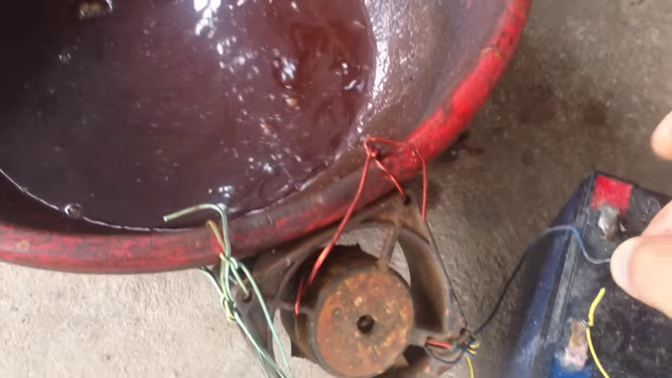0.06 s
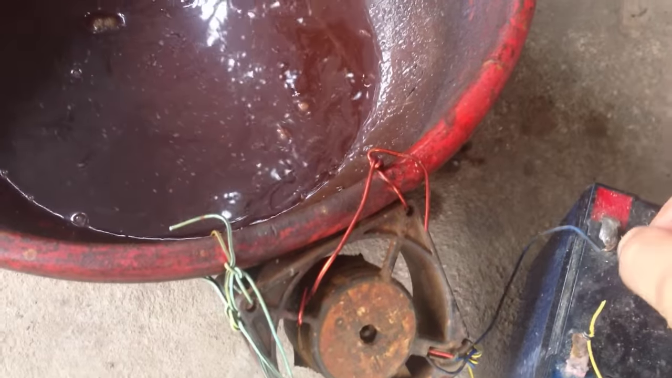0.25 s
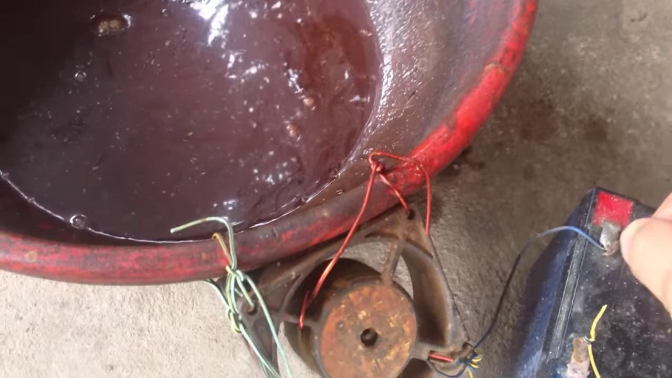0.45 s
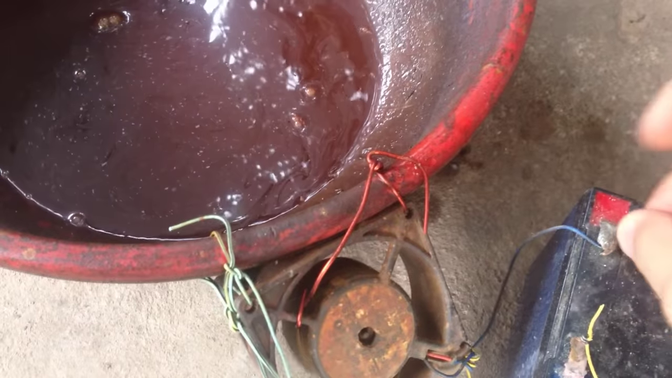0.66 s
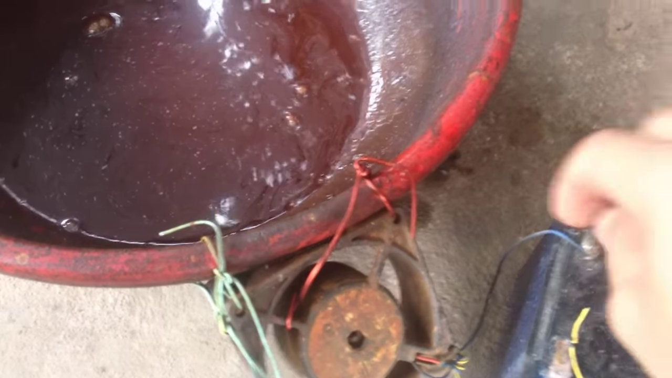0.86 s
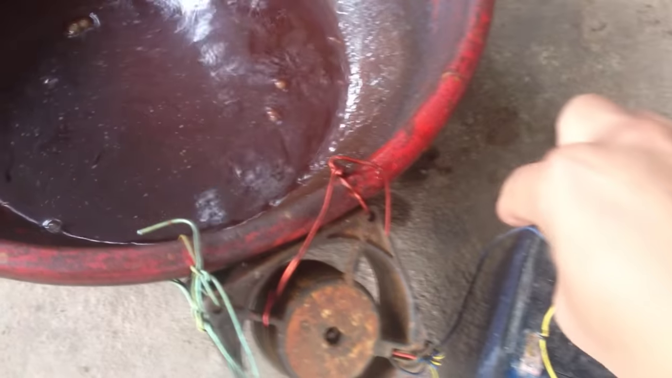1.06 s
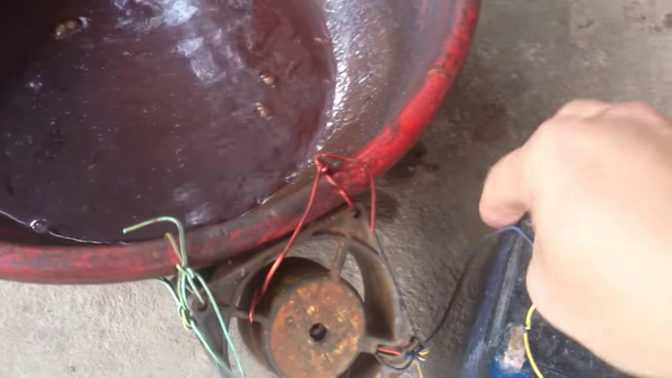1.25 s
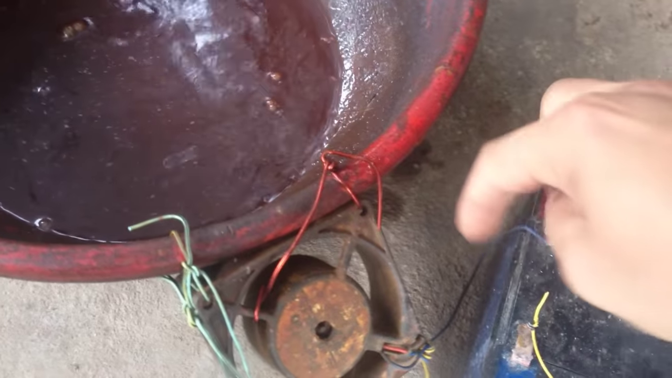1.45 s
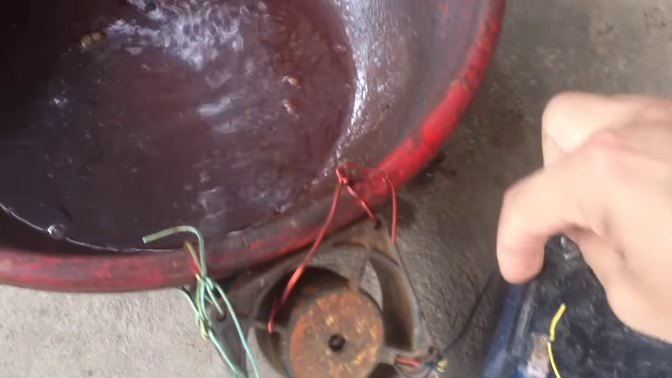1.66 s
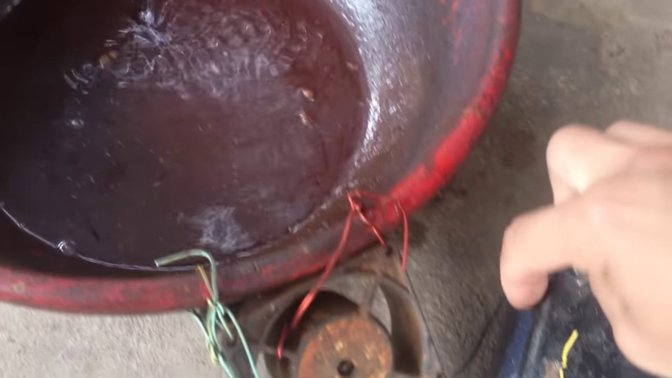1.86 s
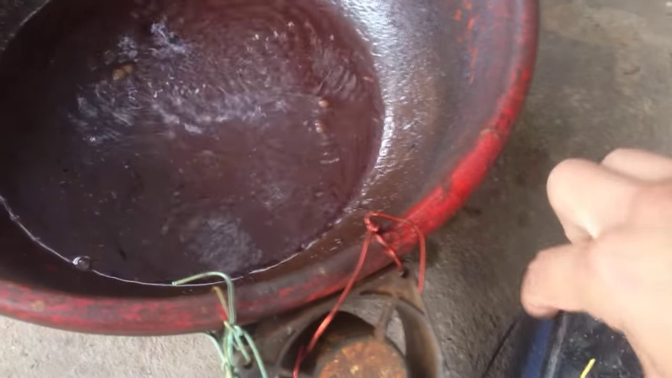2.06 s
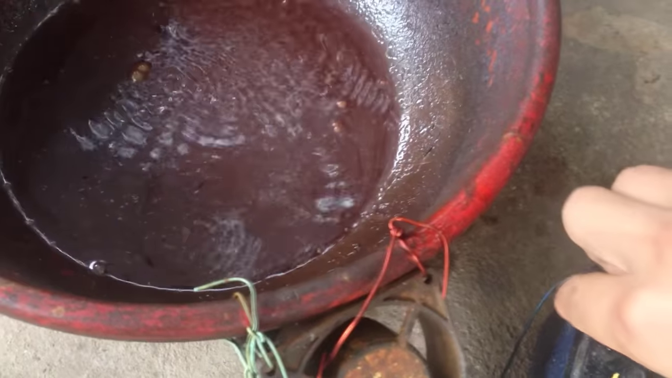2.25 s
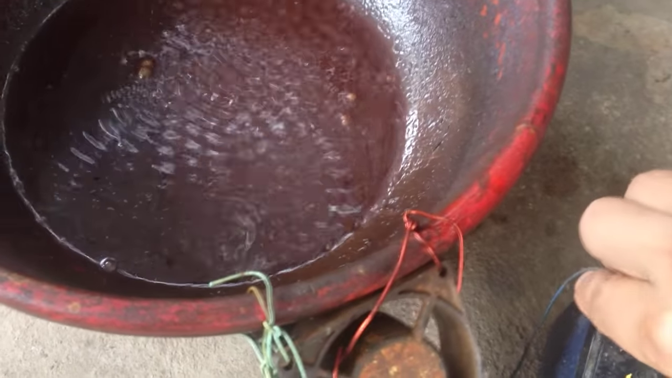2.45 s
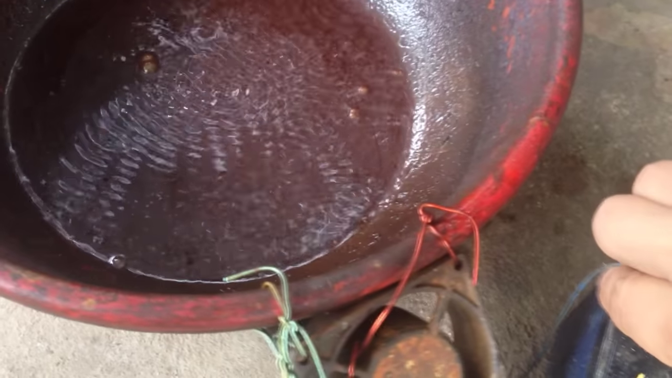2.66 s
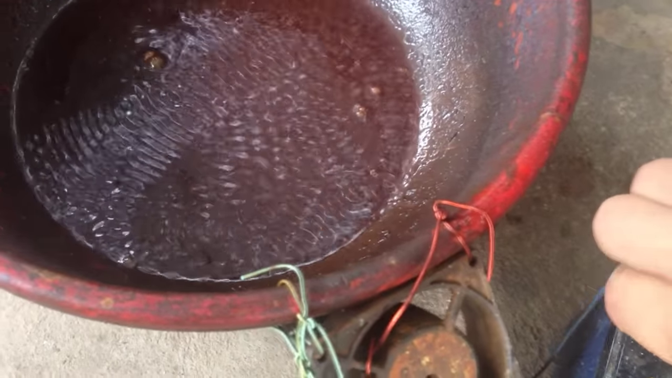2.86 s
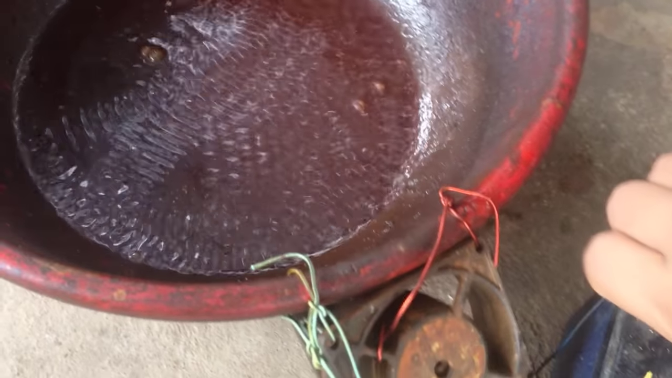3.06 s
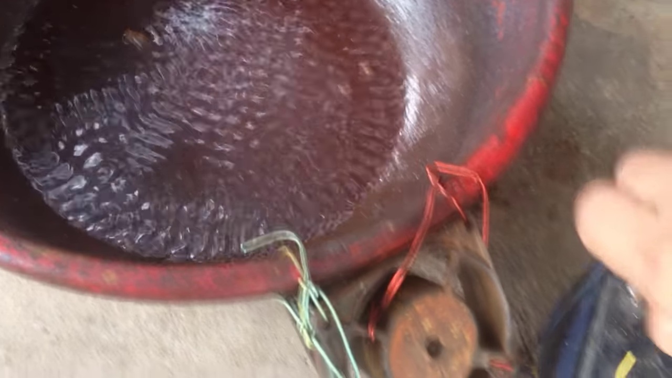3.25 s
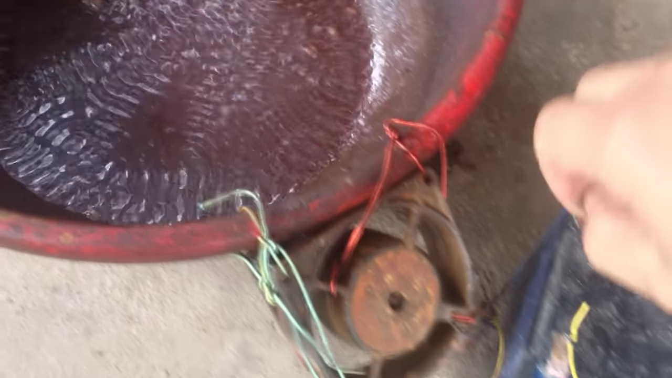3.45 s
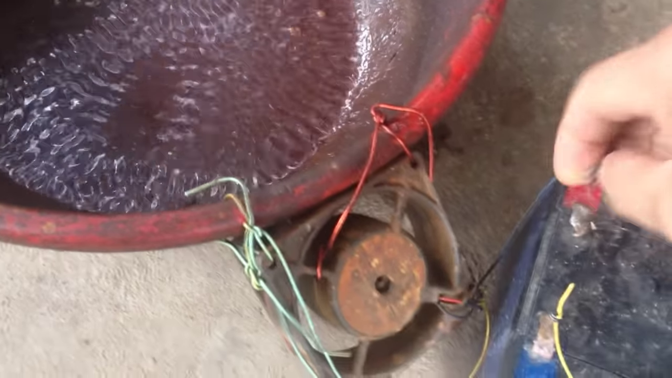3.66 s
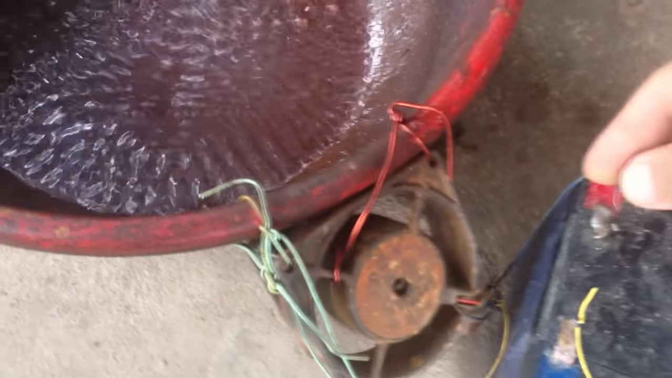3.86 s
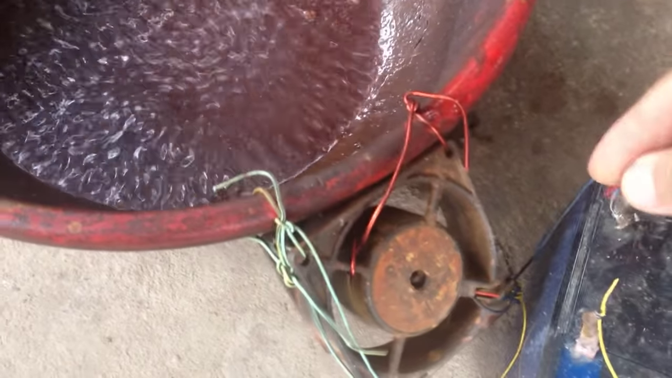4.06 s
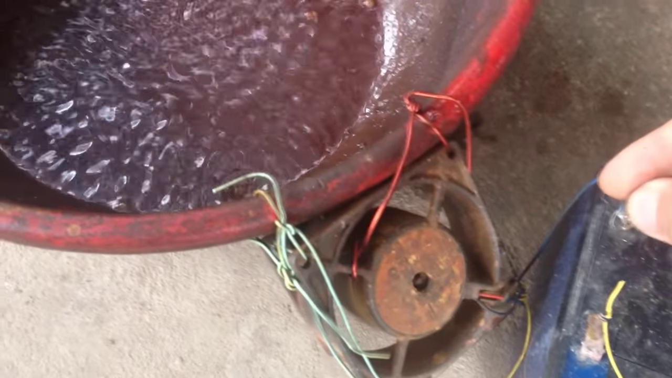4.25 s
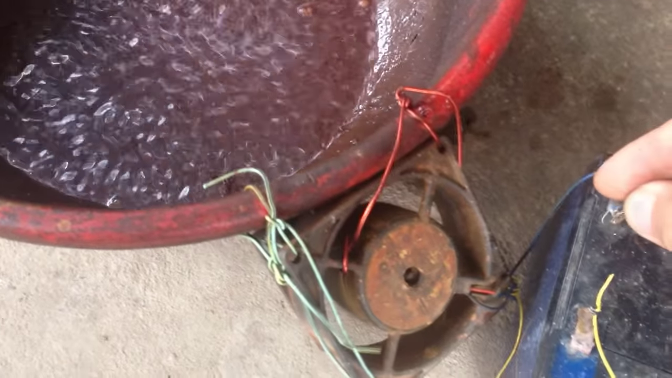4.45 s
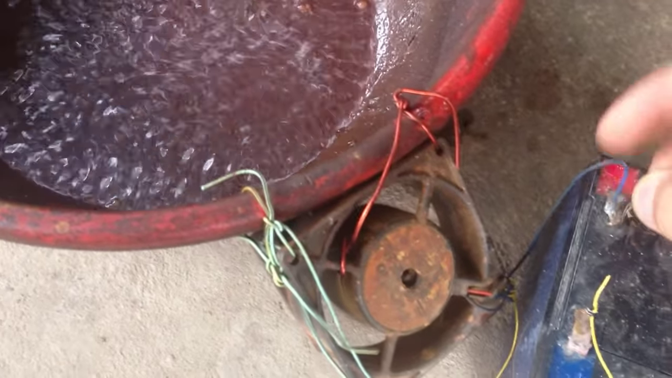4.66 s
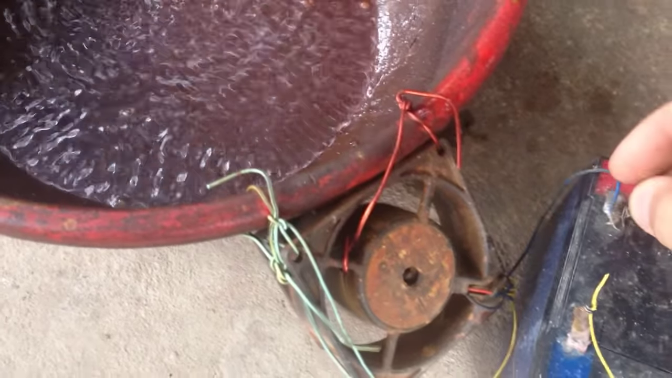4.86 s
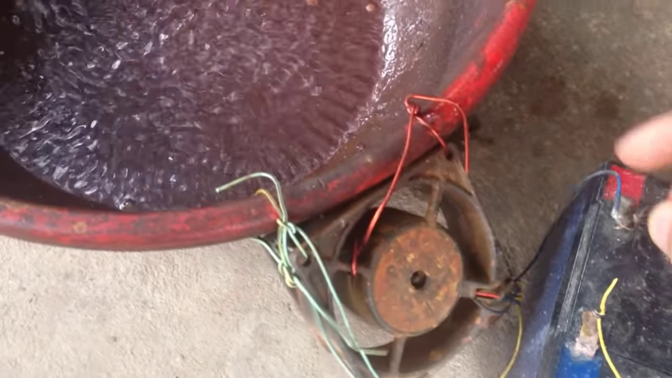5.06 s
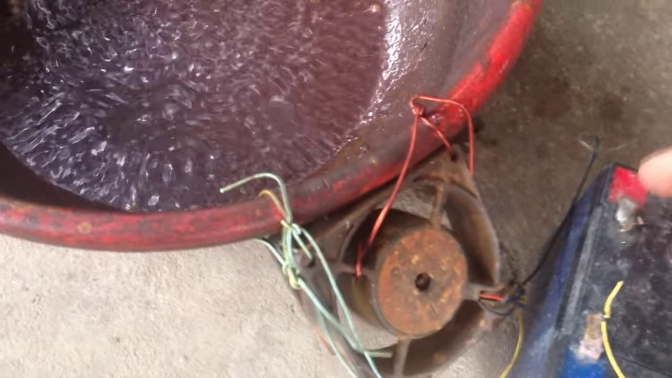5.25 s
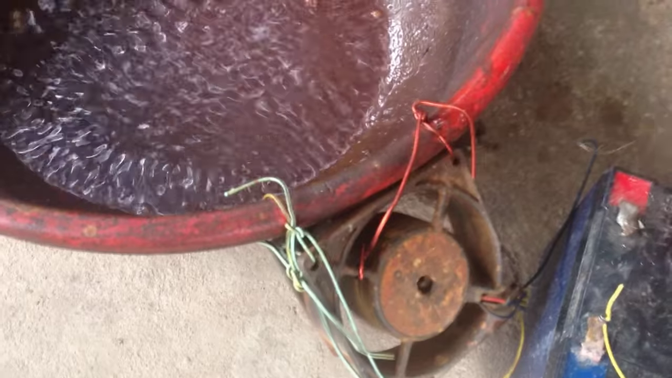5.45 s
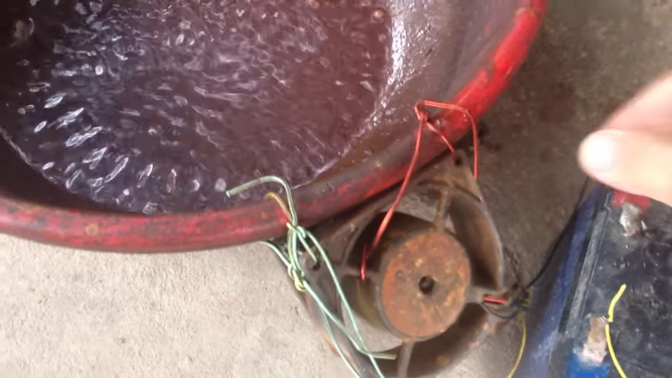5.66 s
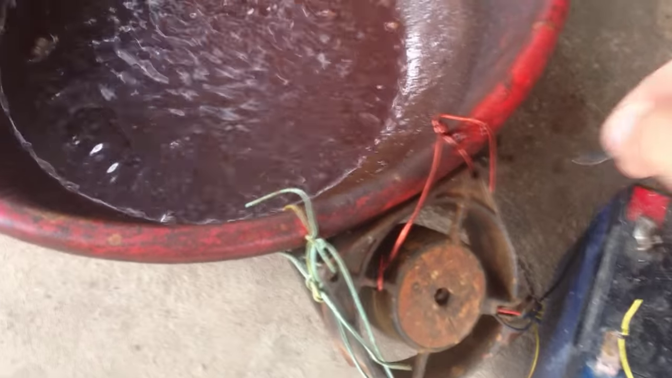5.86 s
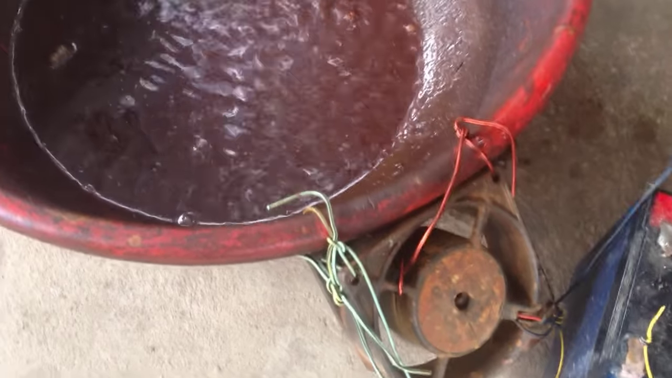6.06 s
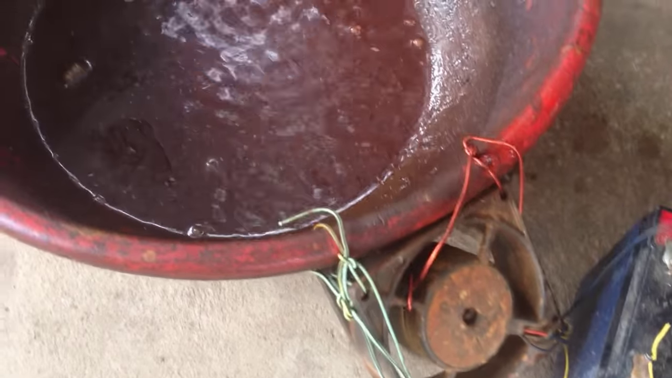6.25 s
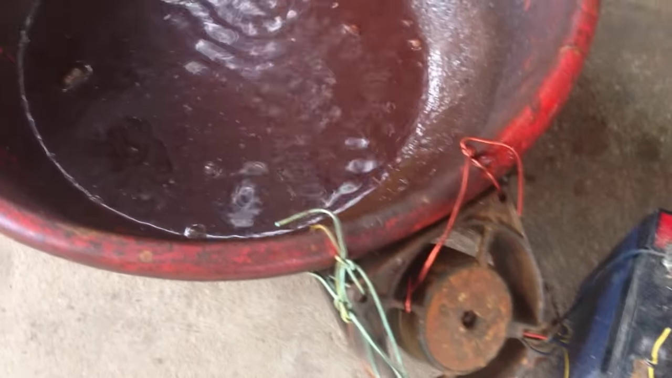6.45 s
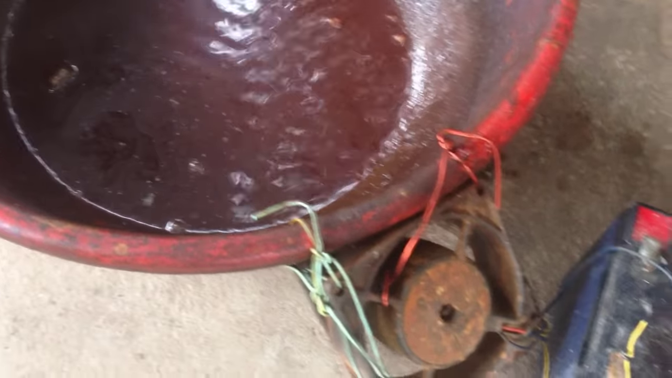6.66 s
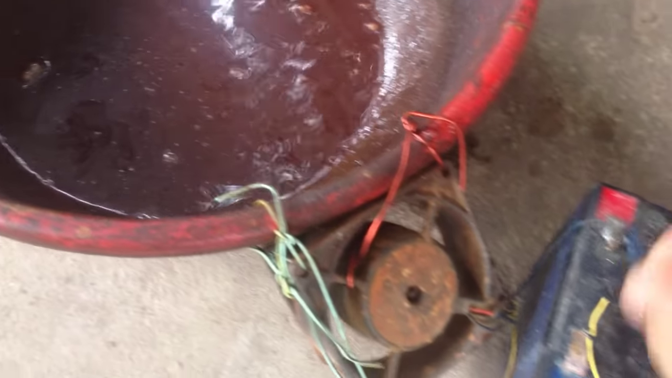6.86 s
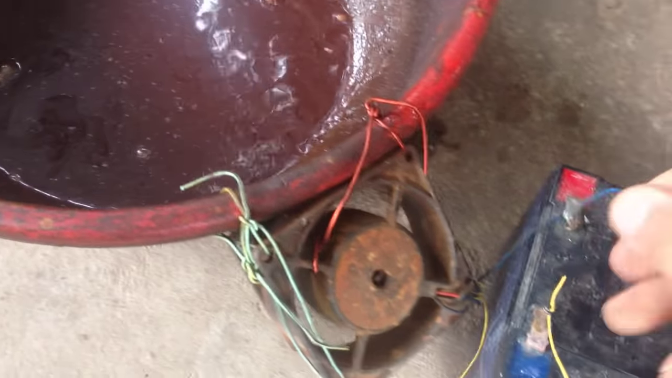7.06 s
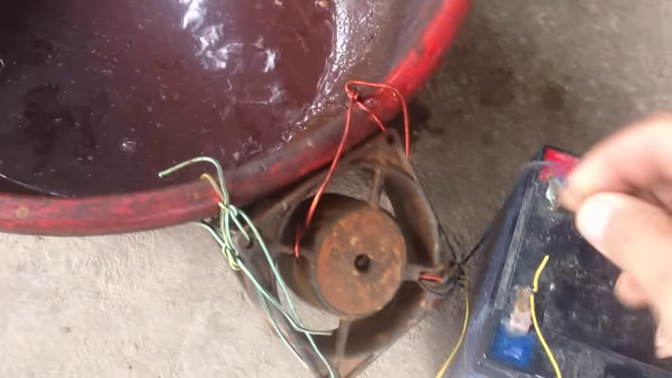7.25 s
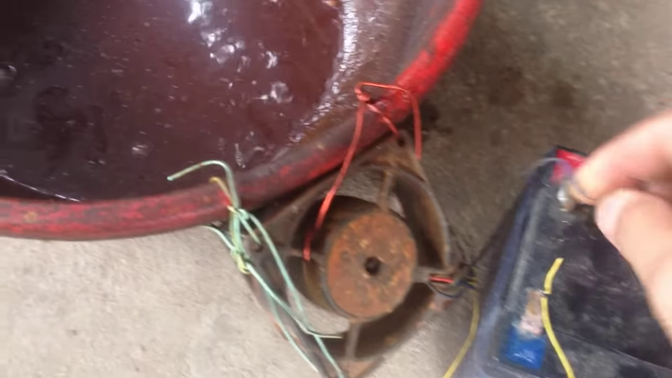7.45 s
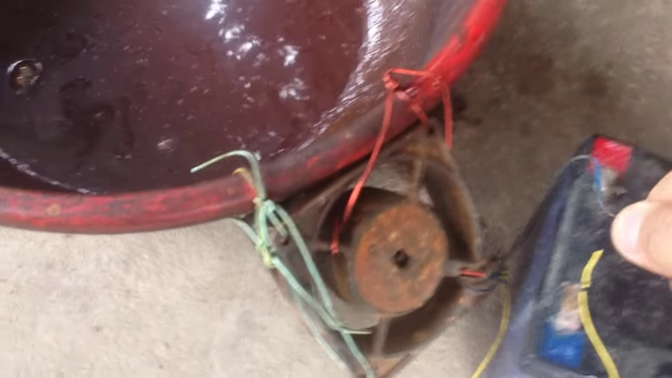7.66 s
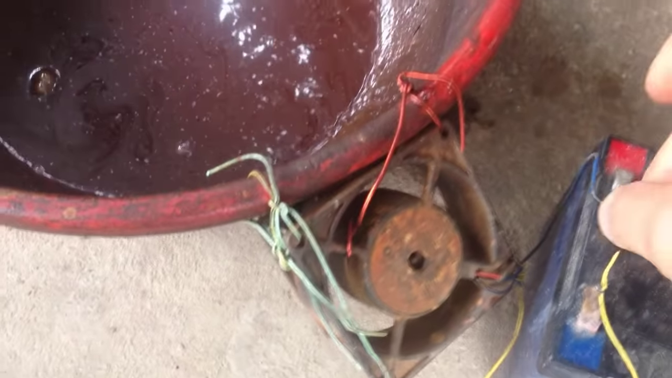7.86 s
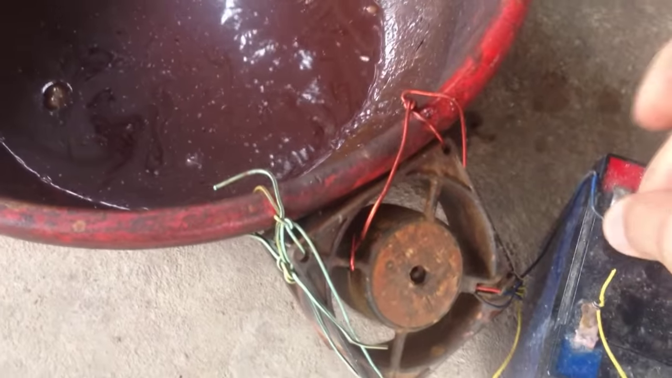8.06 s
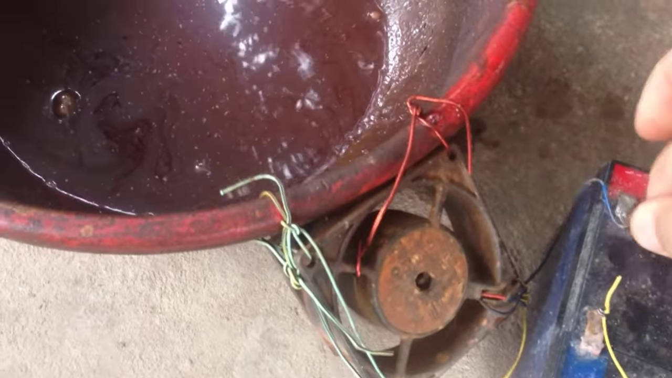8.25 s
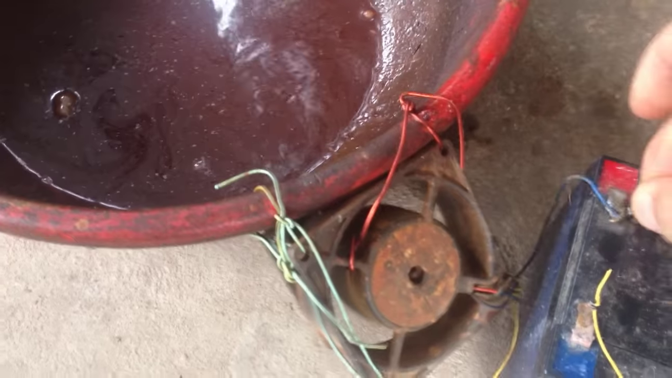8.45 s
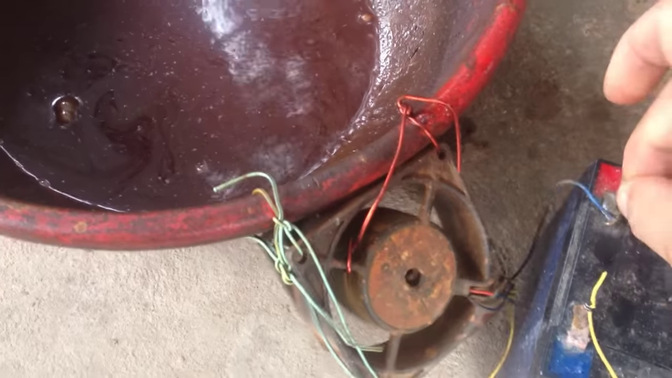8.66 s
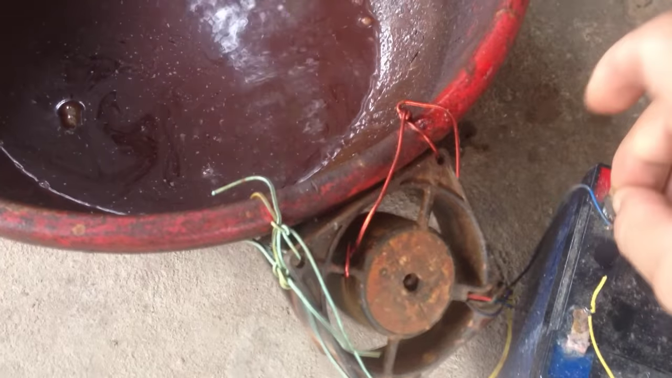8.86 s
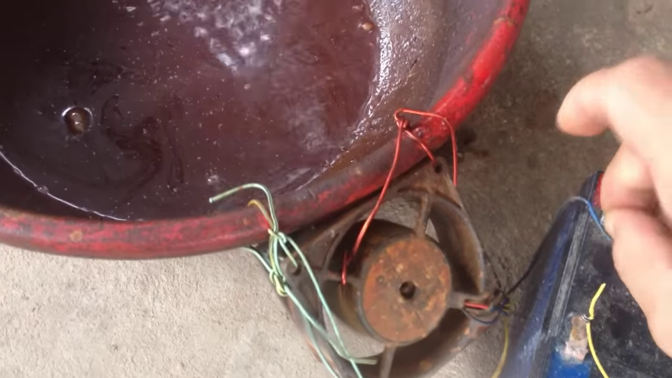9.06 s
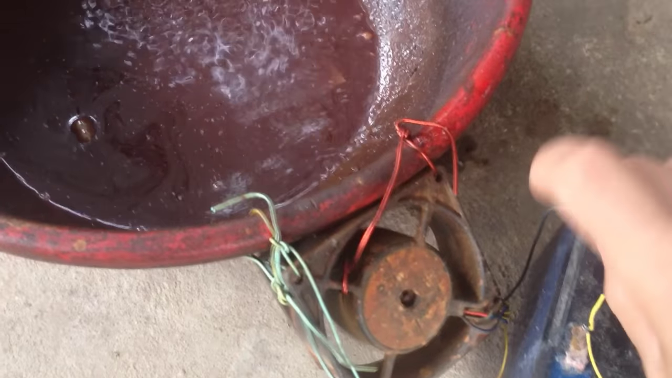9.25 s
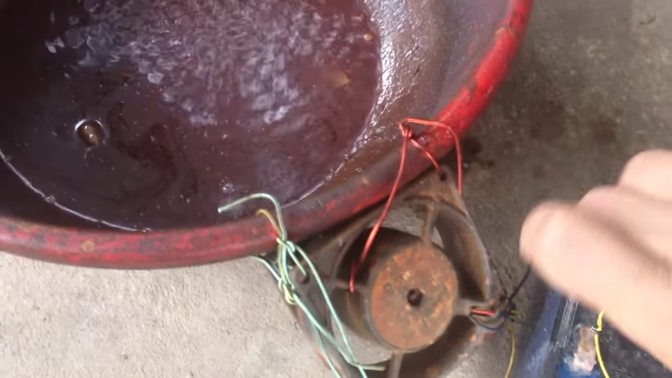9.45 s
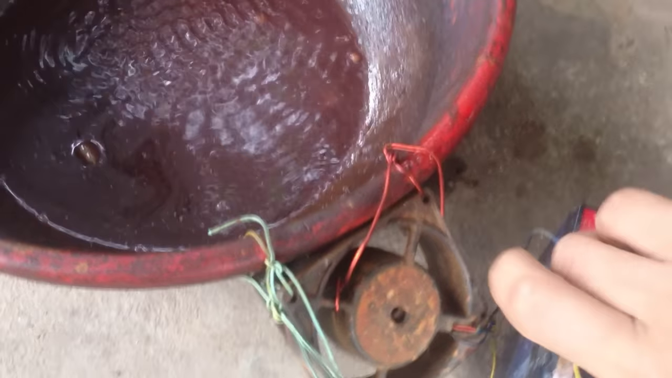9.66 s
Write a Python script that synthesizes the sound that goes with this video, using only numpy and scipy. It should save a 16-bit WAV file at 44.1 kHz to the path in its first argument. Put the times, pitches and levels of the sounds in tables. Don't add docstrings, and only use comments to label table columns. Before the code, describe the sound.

Very close outdoors, a small rusty electric fan spins up quickly, worn bearings rattling with a gritty mid-range hum and bright sizzling. It then leans on a plastic basin, adding fast thumping and a coarse rim buzz. The speed sags, recovers, then coasts down to a thinner, duller rattle before spinning up again. Sharp ticks and hollow knocks pepper it throughout.

```python
import sys
import numpy as np
from scipy import signal
from scipy.io import wavfile
from scipy.ndimage import uniform_filter1d

SR = 44100
rng = np.random.default_rng(int(sys.argv[2]) if len(sys.argv) > 2 else 0)


def unload_wav(signal):
    wavfile.write(
        sys.argv[1],
        SR,
        np.round(np.clip(np.atleast_2d(signal).T, -1, 1) * 32767).astype(np.int16),
    )


def magnitude_from_level(level_db):
    exponent = np.asarray(level_db, float) / 20
    return 10 ** exponent


N = 428211
HZ = np.fft.rfftfreq(8192, 1 / SR)


def evened(x):
    return x / np.sqrt(np.mean(x ** 2) + 1e-20)


def curves(rows):
    start_s, *columns = np.transpose(rows)
    return [np.interp(np.arange(N) / SR, start_s, column) for column in columns]


def slope(points):
    hz, level_db = np.transpose(points)
    return magnitude_from_level(np.interp(np.log(HZ + 1), np.log(hz + 1), level_db))


def modes(table, steep):
    power = 0
    for hz, width_hz, level_db in table:
        power = power + magnitude_from_level(level_db) ** 2 / (1 + (2 * (HZ - hz) / width_hz) ** 2) ** steep
    return np.sqrt(power)


def ring(x, gain):
    both_sides = np.r_[gain, gain[-2:0:-1]]
    log_gain = np.log(np.maximum(both_sides, 1e-6))
    response = np.fft.ifft(np.exp(np.conj(signal.hilbert(log_gain)))).real[:4096]
    return evened(signal.oaconvolve(x, response)[:N])


def noise():
    return rng.standard_normal(N)


def drift(hz):
    return evened(signal.lfilter(*signal.butter(2, hz, fs=SR), noise()))


def grit(per_s, spread_db):
    size = magnitude_from_level(spread_db * np.minimum(rng.exponential(1, N), 5)) * noise()
    return evened(size * (rng.random(N) < per_s / SR))


# hz, level_db (per Hz)
YARD_HISS = [(18, -38), (30, -16), (152, 3), (523, -2), (612, -14), (1420, -9), (3740, -4), (8200, -12),
             (14600, -1), (15800, -7)]
# hz, width_hz, level_db
FAR_DRONE = (81.6, 9, -75)


def yard():
    hiss = ring(noise(), slope(YARD_HISS))
    drone = ring(noise(), modes([FAR_DRONE], steep=1.8))
    return magnitude_from_level(-69.5) * hiss + magnitude_from_level(FAR_DRONE[2]) * drone


# start_s, speed_hz
SHAFT_SPEED = [(0.1, 10.3), (0.39, 17.8), (0.47, 20.1), (0.58, 22.8), (0.98, 30.6), (1.46, 36.0),
               (1.92, 39.3), (3.02, 43.3), (3.15, 41.0), (3.77, 33.9), (3.9, 31.3), (4.41, 36.2),
               (4.52, 35.7), (4.78, 38.0), (5.0, 36.2), (5.08, 34.4), (5.72, 26.7), (6.04, 24.3),
               (6.17, 24.8), (6.33, 24.4), (6.55, 20.9), (6.95, 18.4), (7.81, 15.7), (7.91, 19.4),
               (8.02, 23.2), (8.1, 25.6), (8.29, 29.3), (8.5, 33.1), (8.66, 34.9), (9.71, 41.4)]


def rotor():
    speed_hz = curves(SHAFT_SPEED)[0] * (1 + 0.006 * drift(hz=6))
    return np.cumsum(speed_hz) / SR


# start_s, peak_db, thud_over_peak_db
FRAME_KNOCKS = [(0.139, -39, -25), (0.151, -37, -20), (0.172, -28.5, -30), (0.231, -27, -29),
                (0.26, -26, -29), (0.28, -29, -28), (0.337, -32, -28), (0.423, -28, -31), (0.441, -24, -30),
                (0.526, -24, -31), (0.586, -22, -33), (0.846, -23, -25), (0.869, -20, -28),
                (0.946, -20, -30), (1.053, -23, -25), (1.546, -22, -29), (1.565, -20, -46),
                (1.764, -25, -18), (3.054, -22, -17), (3.628, -21, -32), (4.215, -22, -22),
                (4.687, -25, -18), (4.708, -21, -28), (4.883, -20.5, -20.5), (5.52, -20.5, -27),
                (6.274, -25.5, -24), (6.747, -26, -30), (7.505, -33, -33)]


def knocks():
    start_s, peak_db, thud_db = np.transpose(FRAME_KNOCKS)
    at = np.round(start_s * SR).astype(int)
    t = np.arange(2000) / SR
    hits, thuds = np.zeros((2, N))
    hits[at] = magnitude_from_level(peak_db)
    thuds[at] = magnitude_from_level(peak_db + thud_db)
    body = np.zeros(len(t))
    for hz, level_db in ((760, -2.5), (900, -8), (1800, -15.5)):
        body += magnitude_from_level(level_db - 60 * t / 0.032) * np.sin(2 * np.pi * hz * t)
    body *= np.minimum(t / 0.0013, 1)
    thud = magnitude_from_level(1 - 60 * t / 0.071) * np.sin(2 * np.pi * 150 * t) * np.minimum(t / 0.0068, 1)
    return (signal.oaconvolve(hits, body) + signal.oaconvolve(thuds, thud))[:N]


# start_s, rumble_db, rim_db, thump_db
SUPPORT_LEVELS = [(0.0, -88, -99, -77), (0.21, -57.5, -65, -73), (0.32, -59, -56, -73),
                  (0.4, -56, -53, -71), (0.78, -49, -53, -71), (0.97, -61, -53, -49), (1.16, -60, -51, -54),
                  (1.43, -55, -49, -67), (1.65, -60, -54, -65), (1.67, -56, -55, -57),
                  (1.73, -41, -40.5, -48), (1.86, -40, -38, -52), (1.92, -43, -41.5, -44.5),
                  (2.16, -41.5, -42, -44.5), (2.4, -44, -39.5, -47), (2.59, -41, -45, -45),
                  (2.65, -44, -38.5, -48), (2.73, -46, -46, -53), (2.84, -41, -43, -48),
                  (2.92, -43.5, -43.5, -52), (4.05, -47, -43, -52), (4.84, -41.5, -42.5, -46),
                  (4.92, -43, -44, -50), (5.17, -45, -43.5, -47.5), (5.27, -44.5, -45.5, -52),
                  (5.52, -49.5, -42, -53), (5.6, -54, -57, -61), (5.9, -53.5, -61, -71),
                  (6.14, -58, -60, -72), (6.22, -60.5, -60, -67), (6.3, -48, -62, -61),
                  (6.35, -64, -58, -72), (6.46, -57, -58, -75), (6.52, -56, -55.5, -69),
                  (6.87, -65.5, -58, -79), (7.14, -60, -58, -70), (7.57, -64.5, -62.5, -78),
                  (8.09, -53.5, -55, -71), (8.27, -48.5, -56, -57), (8.44, -52.5, -63, -63),
                  (8.87, -57, -57, -55.5), (8.93, -54, -58.5, -52), (9.0, -44, -57, -56),
                  (9.06, -56, -56, -60), (9.3, -54, -62, -52), (9.38, -47, -59, -58),
                  (9.57, -52, -56, -53.5), (9.71, -51, -65, -57)]
# hz, level_db
THUMP_SPECTRUM = [(25, -46), (40, -12), (70, -7), (120, -1), (160, -0.5), (220, -6.5), (320, -7),
                  (450, -19), (700, -16), (1500, -100)]
# hz, level_db (per Hz)
RUMBLE_SPECTRUM = [(80, -54.5), (140, -14.5), (190, -6), (240, -2.5), (290, -10), (400, 1), (450, -3.5),
                   (600, -26), (1000, -87)]
# hz, width_hz, level_db
RIM_MODES = [(886, 128, 2.5), (1490, 74, -11), (1552, 92, -3), (1717, 110, 5.5), (1874, 142, 3)]


def supports(turns):
    rumble_db, rim_db, thump_db = curves(SUPPORT_LEVELS)
    blows = np.diff(np.floor(turns), prepend=0) * magnitude_from_level(1.9 * drift(hz=30))
    chatter = 0.5 + 0.56 * np.exp(-(turns % 1) / 0.33)
    thump = ring(evened(blows) + 0.41 * chatter * noise(), slope(THUMP_SPECTRUM))
    rumble = ring(chatter * noise(), slope(RUMBLE_SPECTRUM))
    rim_grit = chatter ** 0.68 * magnitude_from_level(1.3 * drift(hz=13)) * grit(per_s=4000, spread_db=2.2)
    buzz = ring(rim_grit, modes(RIM_MODES, steep=1.26))
    return magnitude_from_level(thump_db + 0.5) * thump + magnitude_from_level(rumble_db - 1.5) * rumble + magnitude_from_level(rim_db + 5.5) * buzz


# start_s, peak_db, pitch_hz
BEARING_TICKS = [(0.4459, -43, 8490), (0.5228, -40, 8900), (0.5622, -35, 15000), (0.6954, -37, 10900),
                 (0.8186, -29, 14900), (0.9268, -31, 13000), (0.9434, -25, 14900), (1.4566, -23, 13900),
                 (1.54, -32, 8600), (1.5903, -28, 15100), (1.8497, -26, 14900), (2.3272, -24, 14700),
                 (2.5, -22.5, 14600), (2.7103, -32, 14600), (2.9188, -31, 15200), (3.3169, -27, 15100),
                 (3.3598, -25, 8200), (3.8422, -37, 15000), (3.8986, -30, 15000), (3.953, -34, 15100),
                 (4.0438, -31, 15100), (4.1266, -33, 14500), (4.7257, -30, 14800), (4.9696, -25, 14900),
                 (5.2171, -33, 14800), (5.2387, -23, 15100), (5.2856, -24, 15000), (5.4463, -27, 14900),
                 (5.6212, -29, 14900), (5.7833, -35, 13000), (5.904, -39, 14900), (5.916, -34, 14650),
                 (5.9539, -32, 15000), (6.14, -42, 15320), (6.2812, -34, 14900), (6.349, -33, 14950),
                 (6.3854, -36, 11000), (6.4772, -40, 8700), (6.551, -34, 10900), (6.6073, -31, 14000),
                 (6.661, -32, 15000), (6.7346, -38, 14900), (6.8614, -35.5, 15000), (6.9442, -32, 14100),
                 (7.1455, -44, 8900), (7.5837, -51, 8410), (7.8075, -38, 15000), (7.8673, -31, 14900),
                 (7.9334, -34, 14600), (8.0269, -32, 14360), (8.0771, -32, 14400), (8.0771, -34, 14900),
                 (8.441, -26, 14800), (8.566, -30, 15000), (8.8279, -24, 15100), (8.8553, -26, 15000),
                 (9.0983, -28.5, 15000), (9.1217, -29, 14830), (9.1876, -25, 14900), (9.5472, -22, 15000),
                 (9.644, -25, 14600)]


def ticks():
    out = np.zeros(N + SR)
    t = np.arange(400) / SR
    shape = np.minimum(t / 0.0008, 1) * magnitude_from_level(-60 * t / 0.011)
    for start_s, peak_db, pitch_hz in BEARING_TICKS:
        crackle = np.diff(rng.standard_normal(400), prepend=0)
        burst = np.sin(2 * np.pi * pitch_hz * t) + 0.57 * crackle
        out[round(start_s * SR):][:400] += magnitude_from_level(peak_db + 0.5) * shape * burst
    return out[:N]


def pings(table, catch, per_s, spread_db):
    total = np.zeros(N)
    for hz, width_hz, level_db in table:
        strikes = catch * grit(per_s, spread_db)
        total += magnitude_from_level(level_db) * ring(strikes, modes([(hz, width_hz, 0 + level_db)], steep=1.45))
    return evened(total)


RATTLE_LEVELS = sum([ [(0.09, -61.5, -81.5, -75, -82), (0.318, -35.5, -59, -73, -81),
                 (0.352, -37.5, -61, -58, -80), (0.382, -43, -60, -72, -71), (0.4, -36, -53, -72, -71)],
                 [(0.42, -35, -53.5, -58, -66), (0.49, -35.5, -56, -63, -67), (0.57, -34, -49, -54, -62),
                 (0.75, -32.5, -47.5, -53.5, -57), (0.83, -34.5, -46, -48, -50),
                 (0.86, -34, -48.5, -47.5, -58), (0.94, -34, -41, -48, -53), (0.96, -29, -42, -44, -42),
                 (0.99, -37.5, -47, -49.5, -56), (1.12, -29.5, -43, -42.5, -40), (1.17, -33, -42, -47, -53),
                 (1.19, -34, -44.5, -44, -46), (1.35, -32.5, -45, -45.5, -52),
                 (1.4, -31.5, -43, -43.5, -40), (1.43, -32, -40, -48, -51), (1.45, -34.5, -46, -42, -48),
                 (1.48, -32.5, -41, -44, -40), (1.53, -34.5, -47.5, -49, -56), (1.56, -33, -43.5, -44, -47),
                 (1.64, -34, -43.5, -44.5, -42), (1.66, -31, -45.5, -44.5, -51),
                 (1.89, -33.5, -42.5, -42.5, -43), (1.94, -36.5, -44, -42.5, -51),
                 (2.0, -34.5, -43.5, -42, -43), (2.07, -31.5, -45, -47, -53),
                 (2.13, -33.5, -45, -43.5, -45), (3.24, -37.5, -46.5, -46, -46),
                 (3.42, -34.5, -46, -46, -52), (3.5, -36.5, -45.5, -48, -48), (3.99, -38, -47, -47.5, -48),
                 (4.76, -35, -45, -45.5, -47), (4.82, -37, -45.5, -45.5, -50),
                 (5.62, -37.5, -47.5, -49, -52), (5.83, -37.5, -52, -53.5, -60),
                 (5.96, -38.5, -48, -54, -52), (5.98, -37, -51, -56, -67), (6.03, -36.5, -48.5, -52.5, -56),
                 (6.16, -38.5, -51.5, -56, -64), (6.24, -37, -49, -52, -56), (6.32, -40.5, -51, -58, -63),
                 (6.4, -36.5, -55.5, -54.5, -57), (6.42, -40, -53, -63, -65), (6.5, -37, -51.5, -54, -60),
                 (6.53, -37, -53, -61, -68), (6.55, -37, -52, -56, -61), (6.6, -38.5, -57, -56, -52),
                 (6.63, -39, -54, -55.5, -62), (6.79, -38.5, -55.5, -60, -68), (7.71, -42, -60, -66.5, -73),
                 (7.92, -36, -52, -52.5, -55), (8.0, -39, -53, -55, -59), (8.08, -35, -48.5, -49, -47),
                 (8.13, -37, -48, -51.5, -55), (8.41, -37, -46.5, -47, -50), (8.47, -35.5, -46, -45.5, -46),
                 (9.27, -36, -45, -46, -46.5), (9.48, -34.5, -45, -42, -41), (9.53, -35, -48, -45, -49),
                 (9.55, -36.5, -43, -42, -37), (9.61, -36.5, -48.5, -47, -52), (9.66, -31.5, -45, -43, -42),
                 (9.68, -35, -50, -45, -46), (9.71, -40, -39, -44, -47)], ], [])
# hz, width_hz, level_db
HOUSING_MODES = [(226, 30, -21.5), (328, 61, -18), (395, 24, -16), (512.3, 48.6, -5), (600, 133, -9.5),
                 (745.5, 57.5, 1.5), (794, 44, -1.5), (873.5, 74, -1.5), (933, 74, -2.5), (1170, 70, -19.5),
                 (1287, 180, -21.5), (1345, 57, -22.5)]
# hz, width_hz, level_db
CAGE_MODES = [(1744, 54, 2.5), (1877, 96, 5.5), (1997, 75, 5.5), (2157, 120, 0.5), (2483, 280, -10),
              (2930, 60, -10.5), (3140, 60, -20.5), (3460, 50, -15), (3748, 81, -8), (4153, 275, 1.5),
              (4336, 193, 1), (4596, 230, -5), (5040, 240, -14.5)]
# hz, level_db (per Hz)
FIZZ_SPECTRUM = [(3180, -44), (5400, -6.5), (7170, 0.5), (7760, -2.5), (8520, 2), (9620, -1.5), (11100, 0),
                 (11900, -2), (13300, -8)]
# hz, width_hz, level_db
RACE_MODES = [(6520, 460, -6), (7340, 540, -7), (8600, 790, 0.5), (9850, 770, -6.5), (11000, 660, -2),
              (12700, 800, -5.5)]
# hz, width_hz, level_db
BALL_MODES = [(13700, 440, -2), (14550, 440, -6), (14900, 490, 0)]
# hz, width_hz, depth_db
MODE_DIPS = [(30, 110, 13), (1056, 60, 2.5), (1484, 81, 4.5), (2830, 52, 7), (3044, 78, 13),
             (5135, 116, 5.5)]


def bearings(turns):
    hum_db, cage_db, fizz_db, spark_db = curves(RATTLE_LEVELS)
    load = evened(drift(hz=18.3) + 2.15 * drift(hz=74) + 0.5 * np.cos(2 * np.pi * turns))
    shared = grit(per_s=4000, spread_db=1.8)
    dips = magnitude_from_level(-sum(depth_db * np.exp(-((HZ - hz) / width_hz) ** 2) for hz, width_hz, depth_db in MODE_DIPS))

    hum = ring(magnitude_from_level(1.22 * load) * (shared + 1.22 * noise()), dips * modes(HOUSING_MODES, steep=1.5))
    cage = ring(magnitude_from_level(1.85 * load) * (shared + 0.98 * noise()), dips * modes(CAGE_MODES, steep=1.25))

    catch = magnitude_from_level(2.9 * load + 1.4 * drift(hz=14.7) + 2.5 * drift(hz=200))
    bed = ring(magnitude_from_level(1.56 * load) * (shared + noise()), dips * slope(FIZZ_SPECTRUM))
    fizz = bed + 0.7 * pings(RACE_MODES, catch, per_s=500, spread_db=2.5)

    hiss = ring(magnitude_from_level(1.7 * load) * noise(), modes(BALL_MODES, steep=1.6))
    ball_catch = catch * magnitude_from_level(1.3 * drift(hz=8.8))
    sparks = 0.64 * hiss + pings(BALL_MODES, ball_catch, per_s=650, spread_db=3.0)

    low = magnitude_from_level(hum_db + 0.15) * hum + magnitude_from_level(cage_db + 4.0) * cage
    return low + magnitude_from_level(fizz_db - 1.0) * fizz + magnitude_from_level(spark_db - 0.5) * sparks


def scene():
    turns = rotor()
    return (yard() + knocks() + supports(turns) + ticks() + bearings(turns))[None]


def drop_valleys(x):
    hz, _, z = signal.stft(x, SR, nperseg=1024, noverlap=768)
    near = uniform_filter1d(uniform_filter1d(abs(z) ** 2, size=3, axis=1), size=9, axis=2)
    around = uniform_filter1d(near, size=25, axis=1)
    weak = (near < around * magnitude_from_level(-5.5) ** 2) & (hz[:, None] > 2200)
    z = z * np.where(weak, magnitude_from_level(-3.5), 1)
    return signal.istft(z, SR, nperseg=1024, noverlap=768)[1][:, :N]


def gate_top(x):
    edge_hz = 15310
    lowpass = signal.firwin(2047, edge_hz, window=("kaiser", 9), fs=SR)
    low = signal.oaconvolve(x, lowpass[None], "same")
    top = x - low
    power = top ** 2
    sharp = uniform_filter1d(power, size=90) > magnitude_from_level(11.5) ** 2 * uniform_filter1d(power, size=4000)
    held = np.minimum(uniform_filter1d(1.0 * sharp, size=700) * SR, 1)
    kept = uniform_filter1d(held, size=200)
    return low + magnitude_from_level(-17) * kept * top


def top_cut(x):
    return signal.sosfilt(signal.butter(12, 16310, fs=SR, output="sos"), x)


def record(dry):
    thinned = signal.lfilter(*signal.butter(2, 45, "high", fs=SR), dry)
    return top_cut(gate_top(drop_valleys(thinned)))


dry = scene()
out = record(dry)
unload_wav(out)
```